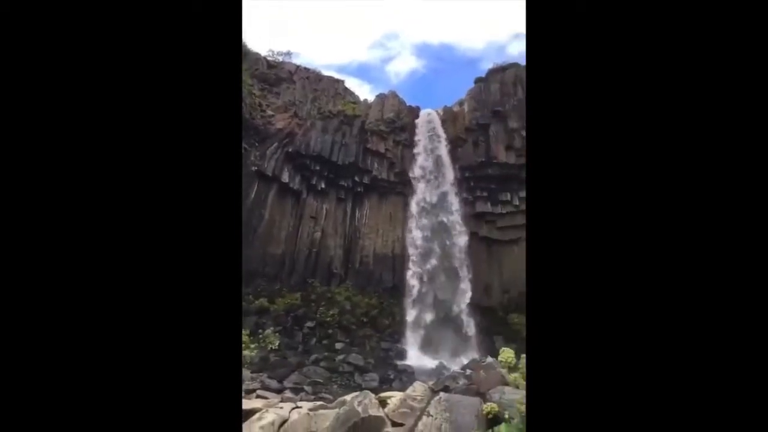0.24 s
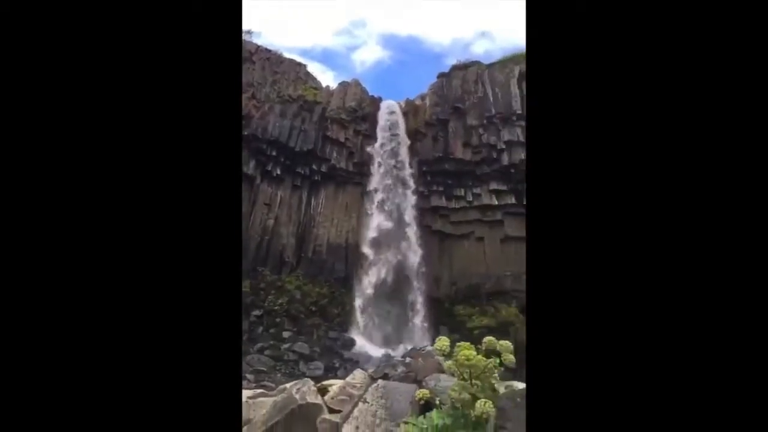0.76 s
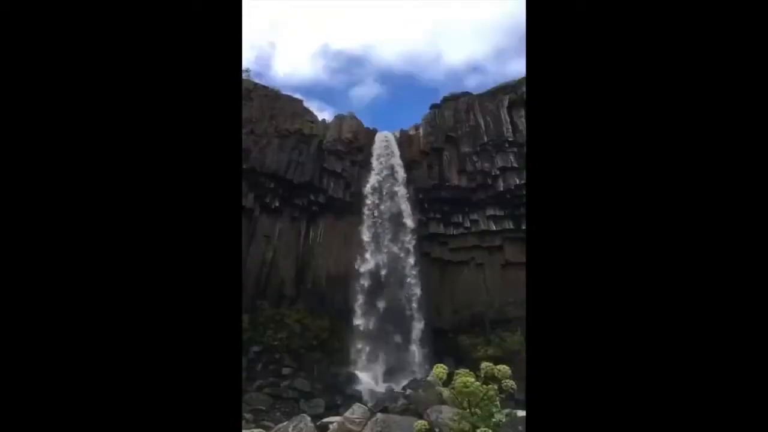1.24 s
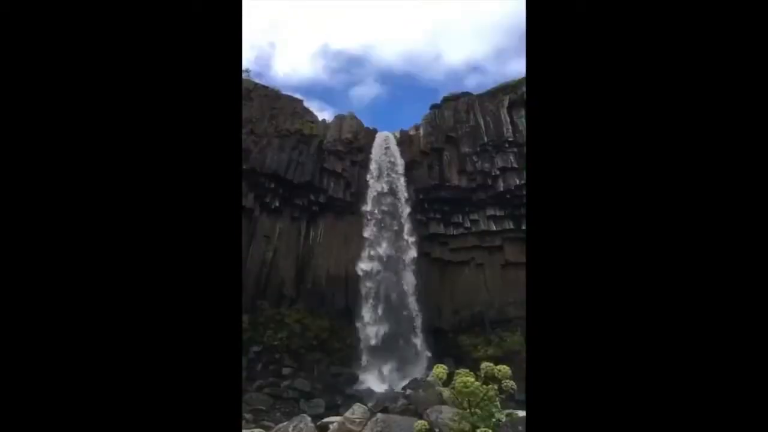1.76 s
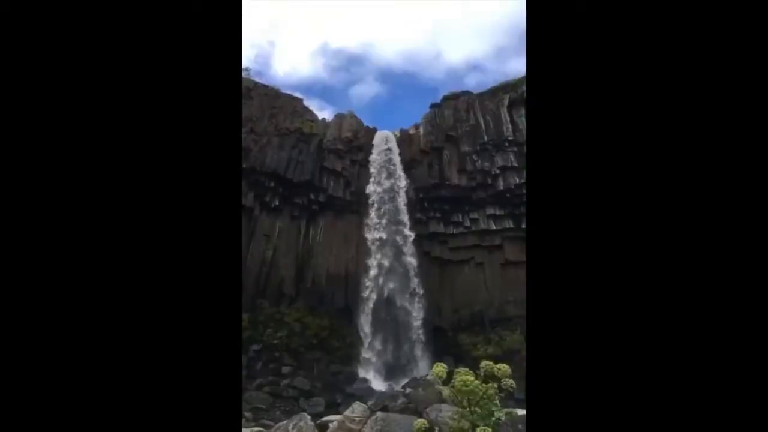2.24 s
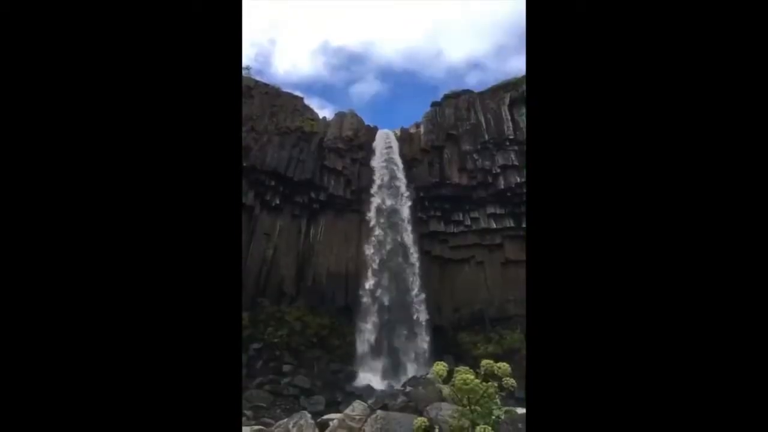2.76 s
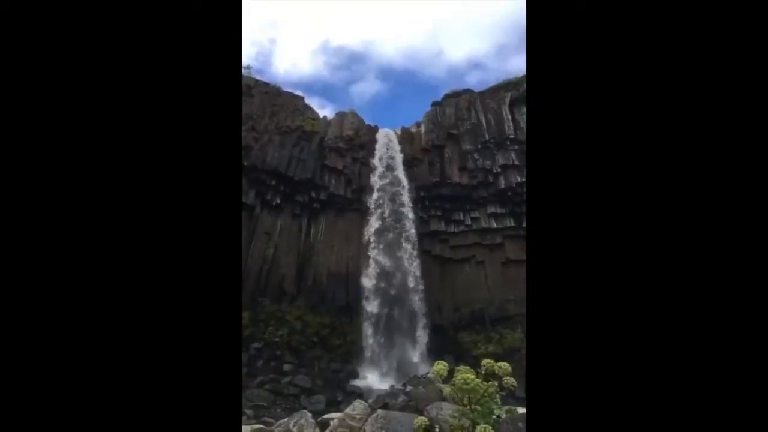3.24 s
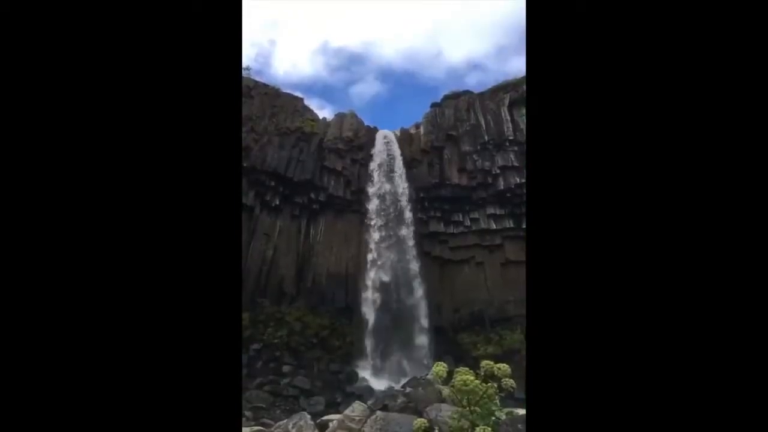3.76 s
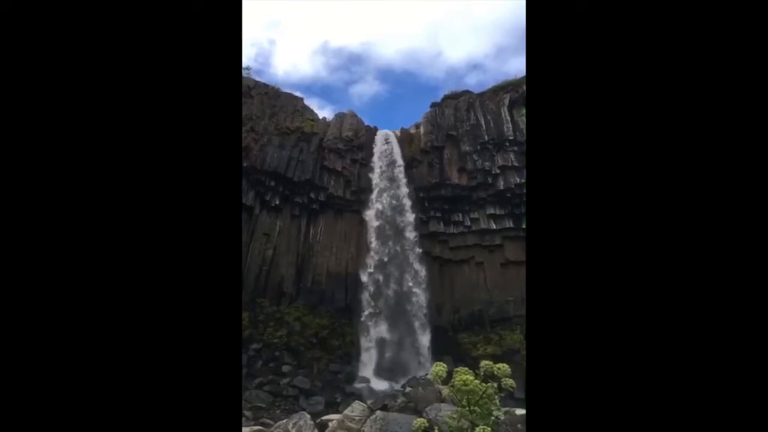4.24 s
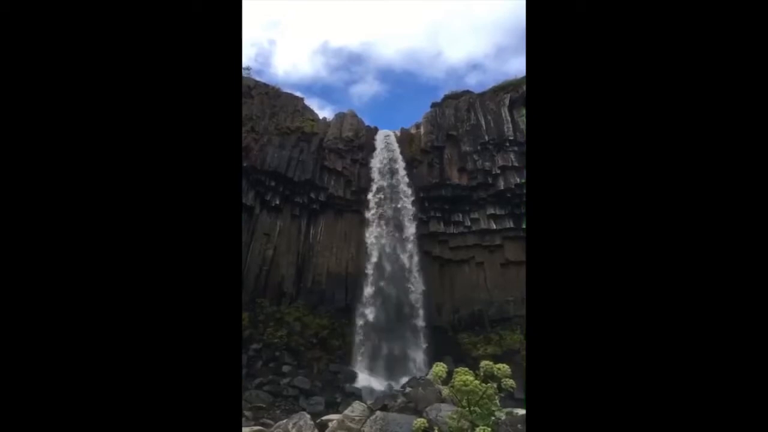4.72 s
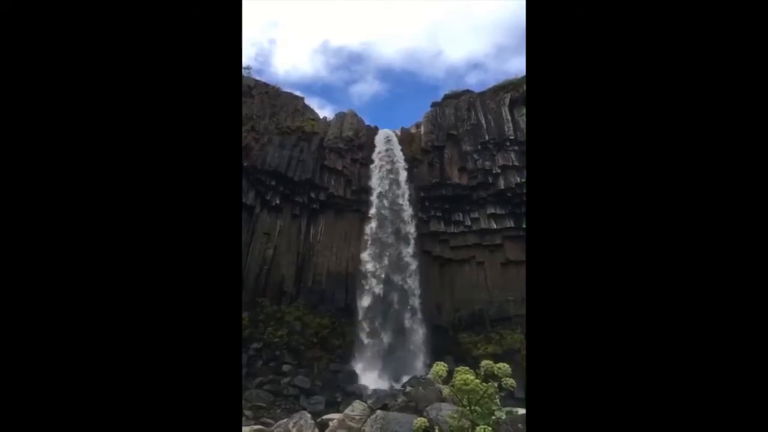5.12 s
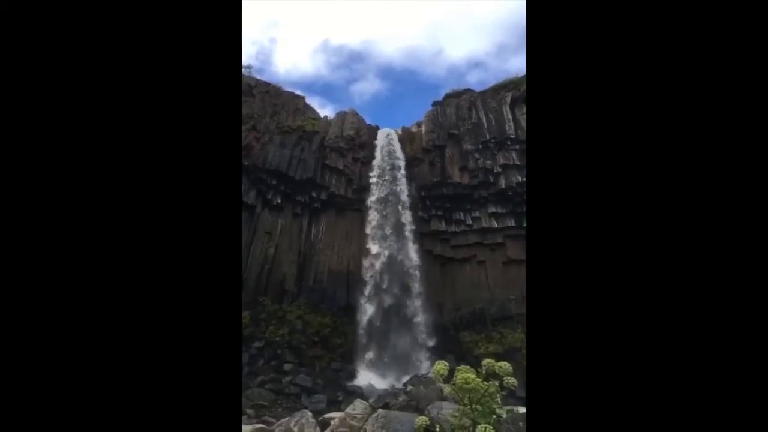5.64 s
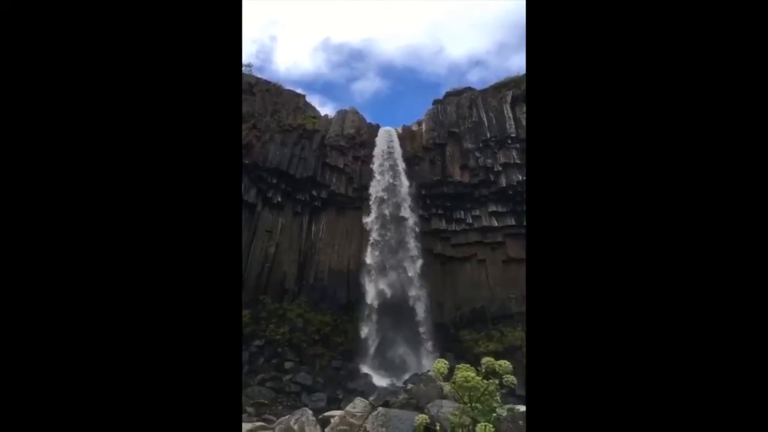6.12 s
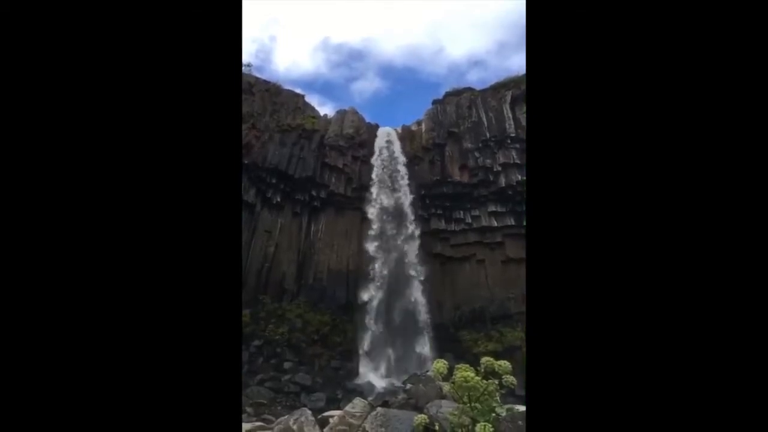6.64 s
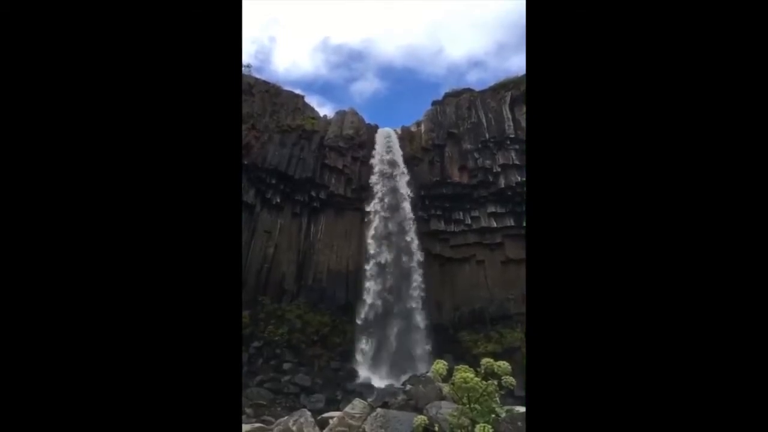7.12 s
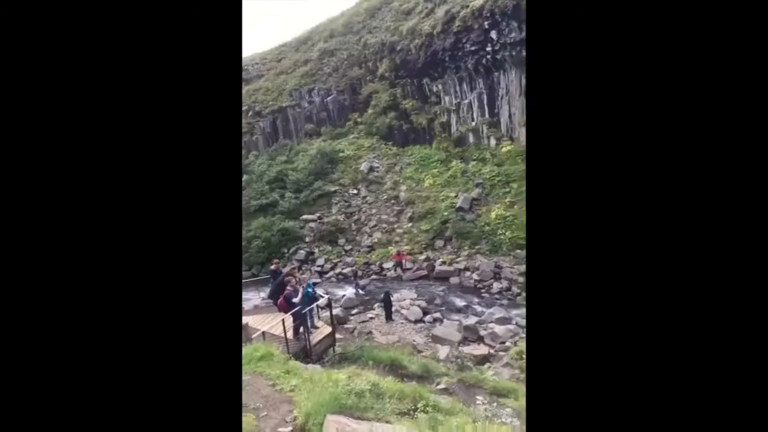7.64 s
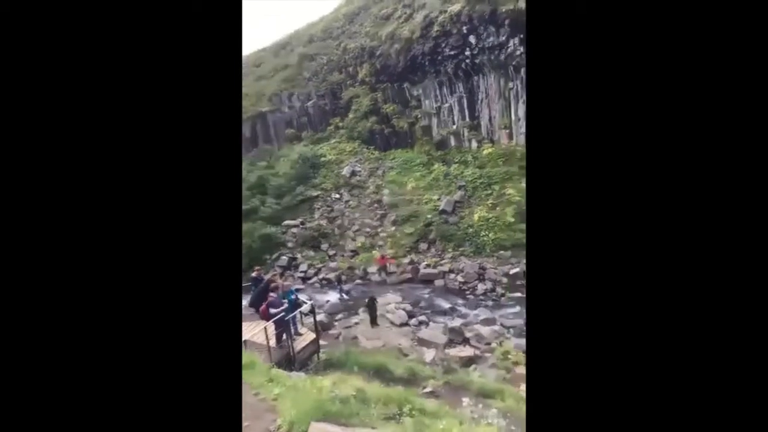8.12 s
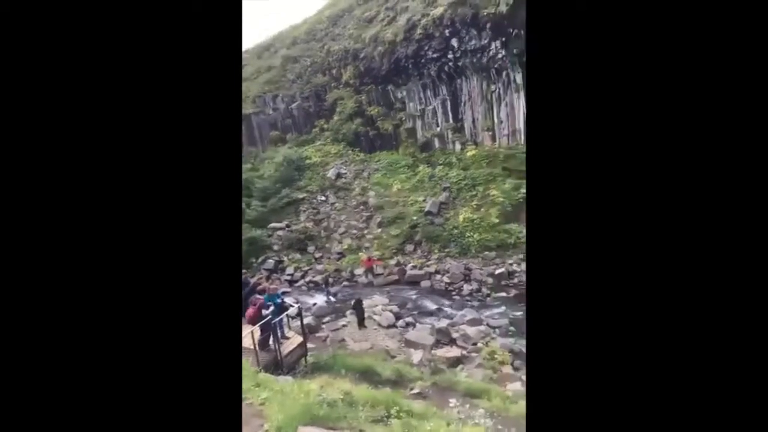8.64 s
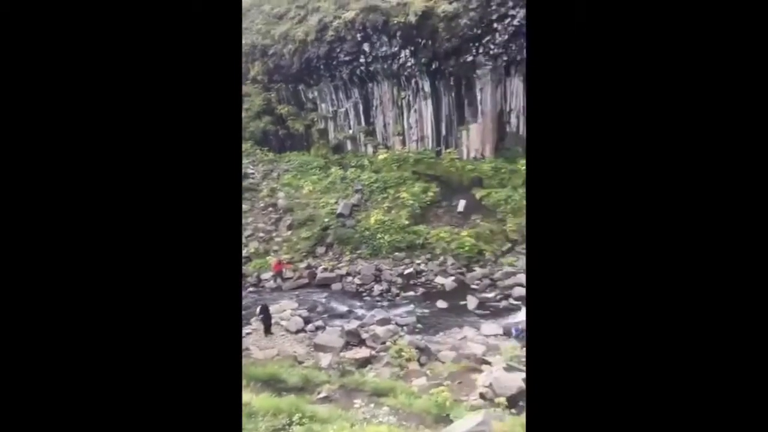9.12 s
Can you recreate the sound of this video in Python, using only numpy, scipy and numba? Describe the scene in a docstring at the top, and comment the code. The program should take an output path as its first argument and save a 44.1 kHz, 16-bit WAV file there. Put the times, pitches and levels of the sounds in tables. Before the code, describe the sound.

A tall waterfall roars and hisses onto rocks outdoors in three abruptly cut stretches, with short silences between and low bumping gusts beneath.

```python
"""A tall waterfall pounds rocks and a pool under a cliff, heard outdoors from three standpoints in turn.
The first stops near 0.96 s; the second starts at 1.01 s, takes a heavier sheet of water from 2.6 to 5 s
and is cut at 7.19 s, with two tiny clicks just after; the third runs from 7.77 s to the end, each with
its own colour. Throughout, ringing bubbles over noise make bass rumble, pool roar, spatter on stone and
hissing spray; short low pushes make the thuds of gusts and heavy slugs of water."""
import sys
import numpy as np
from scipy import signal
from scipy.fft import rfft, irfft, next_fast_len
from scipy.io import wavfile
from scipy.ndimage import map_coordinates
from numba import njit

SR = 44100
rng = np.random.default_rng(int(sys.argv[2]) if len(sys.argv) > 2 else 0)


def int16_out(signal):
    """Quantize to a 16-bit WAV file."""
    q = np.round(np.clip(np.atleast_2d(signal).T, -1, 1) * 32767)
    wavfile.write(sys.argv[1], SR, q.astype(np.int16))


def gain_from_decibels(decibels):
    """Convert decibel values to linear amplitude factors."""
    exponent = np.asarray(decibels, float) / 20
    return 10 ** exponent


N = 413658  # samples
T = np.arange(N) / SR  # s
COARSE_T = T[::64]  # s, enough for slow level changes
PAD = next_fast_len(N)
HZ = np.fft.rfftfreq(PAD, 1 / SR) + 1  # the 1 Hz offset keeps logarithms finite


def unit(x):
    """Scale to rms 1."""
    return x / np.sqrt(np.mean(x ** 2))


def walk(rate):
    """Smooth random wander of rms 1 on the coarse clock, through `rate` random points a second."""
    knots = rng.standard_normal(400)
    return unit(map_coordinates(knots, [COARSE_T * rate], order=3, mode="mirror"))


def follow(points):
    """Straight lines in dB between (time, level) points."""
    t, db = np.transpose(points)
    return np.interp(T, t, db)


def colour(x, points):
    """Filter by (frequency, dB) points, straight on a log frequency axis; rms 1."""
    hz, db = np.transpose(points)
    size = next_fast_len(len(x))
    bin_hz = np.fft.rfftfreq(size, 1 / SR) + 1
    gain = gain_from_decibels(np.interp(np.log(bin_hz), np.log(hz), db))
    return unit(irfft(rfft(x, size) * gain, size)[:len(x)])


def thuds():
    """A slug of water or a gust gives a low push of a cycle or two under a bell-shaped envelope."""
    # heavy bass thuds: t/s, envelope peak level/dB, f/Hz
    pushes = [(.4, -27, 60), (1.33, -26, 70), (1.72, -23, 70), (3.36, -24, 60), (3.5, -23, 55),
              (3.86, -22, 44.6), (4.42, -24, 100), (4.62, -25, 60), (5.0, -26, 45), (5.66, -21.5, 55),
              (6.5, -23, 65), (7.87, -27, 55), (8.13, -24, 70), (8.22, -21, 65), (8.285, -23, 65),
              (8.54, -27, 45), (8.612, -22, 55)]
    bell_cycles = 0.79  # from the peak to 1/e
    out = np.zeros(N)
    for (at, db, hz), phase in zip(pushes, rng.random(len(pushes))):
        near = slice(max(int((at - .1) * SR), 0), int((at + .1) * SR))
        turns = (T[near] - at) * hz
        envelope = gain_from_decibels(db) * np.exp(-(turns / bell_cycles) ** 2)
        out[near] += envelope * np.cos(2 * np.pi * (turns + phase))
    return out


@njit
def ring(start, stop, size, turn, bend, length):
    """Each bubble rings as a dying sine: a pointer that turns, shrinks and speeds up."""
    out = np.zeros(length)
    for j in range(len(start)):
        pointer, step = size[j], turn[j]
        for i in range(start[j], stop[j]):
            pointer *= step
            step *= bend[j]
            out[i] += pointer.imag
    return out


def impacts(lo_hz, hi_hz, rate, cycles, spread_db, share):
    """Near drops trap bubbles of uneven size over a noise blur of countless far ones."""
    when, pitch, chance = rng.random((100000, 3))[:int(rate * N / SR)].T
    hz = lo_hz * (hi_hz / lo_hz) ** (1.2 * pitch - .1)  # spills a little past both edges
    size_db = np.minimum(-spread_db * np.log(chance + 1e-9), 12)
    size = hz * gain_from_decibels(size_db)  # small bubbles die sooner, so they strike harder for an even spectrum

    step = 2 * np.pi * hz / SR  # radians a sample
    span = cycles * SR / hz  # samples in which the ring falls by e^3
    start = (when * N).astype(np.int64)
    stop = np.minimum(start + 2 * span, N).astype(np.int64)
    turn = np.exp(1j * step - 3 / span)
    bend = np.exp(1j * step * 0.029 / span)  # pitch creeps up as the bubble nears the surface
    near = ring(start, stop, size + 0j, turn, bend, PAD)

    far = rng.standard_normal(PAD) * np.sqrt(SR / 2 / (hi_hz - lo_hz))  # rms 1 within the layer
    share = np.clip(share, 0, 1)
    return np.sqrt(share) * unit(near) + np.sqrt(1 - share) * far


def churn(layer, surge):
    """Impacts split by bubble size: all sizes surge together, neighbours share patches, each flickers alone."""
    bands = 6
    lo_hz, hi_hz, *bubbles, surge_db, patch_db, flicker_db = layer
    spectrum = rfft(impacts(lo_hz, hi_hz, *bubbles))[HZ < 1.5 * hi_hz]
    place = np.log(HZ[:len(spectrum)] / lo_hz) / np.log(hi_hz / lo_hz) * bands - .5
    patches = walk(6.9), walk(6.8)
    out = np.zeros(N)
    for k in range(bands):
        weight = np.cos(np.pi / 2 * np.clip(place - k, -1, 1)) ** 2  # bands crossfade
        turn = np.pi / 2 * k / (bands - 1)  # lowest band takes one patch, highest the other
        patch = np.cos(turn) * patches[0] + np.sin(turn) * patches[1]
        db = surge_db * surge + patch_db * patch + flicker_db * walk(18.)
        band = irfft(spectrum * weight, PAD)[:N]
        out += band * np.interp(T, COARSE_T, gain_from_decibels(db))
    return out


def bumps(times, dbs, length):
    """Bell-shaped level changes in dB."""
    bells = np.exp(-((COARSE_T[:, None] - times) / length) ** 2)
    return np.interp(T, COARSE_T, bells @ dbs)


def levels():
    """Level of each layer in dB: its slow course, brief random level changes, and a random heave."""
    # slow course of the bass rumble: t/s, level/dB
    rumble = [(0, -33), (.2, -37), (.96, -36.5), (1.01, -35), (1.4, -33.5), (1.7, -35.5), (2.0, -32.5),
              (2.9, -31.5), (3.15, -36), (3.5, -33), (4.45, -32), (4.8, -32.5), (5.2, -31), (5.95, -33),
              (6.4, -32.5), (6.75, -33.5), (7.19, -34.5), (7.77, -38), (8.2, -30.5), (8.4, -35.5),
              (8.57, -32.5), (8.72, -36), (9.38, -35)]
    # slow course of the pool's roar: t/s, level/dB
    roar = [(0, -30.5), (.27, -34), (.6, -30.5), (.96, -31), (1.01, -30.5), (1.75, -29), (3.3, -31),
            (4.0, -30.5), (4.3, -29.5), (5.0, -31.5), (5.5, -28), (5.92, -32.5), (6.4, -28.5), (7.19, -31),
            (7.77, -34), (8.2, -32), (8.6, -33), (9.38, -33)]
    # slow course of the spatter on stone, a heavier sheet of water from 2.6 to 5 s: t/s, level/dB
    spatter = [(0, -32), (.96, -32), (1.01, -30), (1.6, -31.5), (1.819, -31.5), (2.6, -31), (2.635, -27.5),
               (3.85, -27.5), (4.03, -30), (4.25, -26.5), (4.85, -27.5), (5.05, -31), (5.55, -29.5),
               (5.93, -33), (6.2, -29.5), (7.19, -31.5), (7.77, -37), (8.1, -35.5), (8.85, -36.5),
               (9.2, -33), (9.38, -34.5)]
    # slow course of the spray: t/s, level/dB
    spray = [(0, -38.5), (.4, -37), (.96, -39), (1.01, -34), (1.45, -33.5), (1.65, -35.5), (2.5, -35),
             (2.65, -33.5), (3.28, -32.5), (3.4, -33.5), (3.8, -32.5), (4.6, -32.5), (5.3, -34),
             (5.95, -35.5), (6.15, -34), (7.19, -36), (7.77, -38.5), (8.08, -37.5), (8.55, -41), (9.2, -37),
             (9.38, -37)]
    # brief random level changes, up (+) or down (-): t/s, roar/dB, spatter/dB, spray/dB
    level_bumps = [(.7, 1, 2, 2), (.745, -2.5, 0, -6), (.88, 0, -2, -5), (1.82, -0.5, 4.5, 4),
                   (2.45, 0, -1.5, -4), (2.67, -0.5, 1, 2), (3.2, 2.5, 0, -0.5), (3.35, -2, -3, -1),
                   (3.82, 0, 2, 0), (4.12, -4, -3, -1), (4.73, 2, 0.5, -4), (5.22, -1.5, -4, -3),
                   (5.57, 1, 2, -0.5), (6.05, 1, 3, -2), (6.2, -1.5, -0.5, 0), (6.31, 0.5, 0, 3),
                   (6.8, 2, -1.5, -2.5), (7.07, 2.5, 1, -2), (7.92, 2.5, 0, -3), (8.09, 1.5, 2, 3.5),
                   (8.135, 3, 2, 0.5), (8.28, 3, 1.5, 0), (8.45, 2, 1.5, -0.5), (8.612, 2.5, 2, 1),
                   (8.68, -3.5, -2, 0), (8.72, 1, 2, 1), (8.79, 2, 1, 1)]
    # rms of the random heave, one value a layer from bass to spray: level/dB
    heave_db = [1.1, 0.33, 0.51, 0.41]
    bump_s, heaves_per_s = .021, 8.
    when, *dbs = np.transpose(level_bumps)
    changes = [0] + [bumps(when, db, bump_s) for db in dbs]  # the rumble has none
    out = []
    for course, change, db in zip((rumble, roar, spatter, spray), changes, heave_db):
        heave = db * np.interp(T, COARSE_T, walk(heaves_per_s))
        out.append(follow(course) + change + heave)
    return out


def opening(t, stop, tail_db, tail_s):
    """Gain of a standpoint: the sound stops abruptly, leaving a dying tail and any clicks just after the cut."""
    # two tiny clicks of sound just after the middle cut: t/s, level against the flow/dB, length/s
    clicks = [(7.201, -16, 0.0005), (7.204, -10, .001)]
    tail = gain_from_decibels(tail_db) * np.exp(-np.clip(t - stop, 0, None) / tail_s)
    click_gain = sum(gain_from_decibels(db) * np.exp(-np.minimum(((t - at) / length) ** 2, 50)) for at, db, length in clicks)
    return np.where(t < stop, 1, tail + click_gain)


def scene():
    """The same falling water, coloured anew at each standpoint, with thuds beneath."""
    # rumble, roar, spatter and spray: lowest f/Hz, highest f/Hz, bubbles/per s, ring/cycles,
    # size spread/dB, bubble share of power/0-1, surge/dB, patch/dB, flicker/dB
    water_layers = [(18, 260, 140, 4.5, 0.5, 0.22, 0.5, 0.85, 1.4),
                    (247.06, 1900, 450, 55, 0.9, 0.58, 0.57, 0.28, 0.5),
                    (1879, 5500, 1200, 62, 1.5, 0.43, 0.83, -0.07, 0.86),
                    (5320, 15500, 9700, 4.3, 2.5, 0.4, 0.36, -0.35, 0.92)]
    # colour of rumble and roar, one curve a standpoint: f/Hz, relative level/dB per Hz
    low_colours = [
        [(12, -56), (20, -28.5), (65, -3), (134, -11), (157, -10.5), (208, -13), (299, -9), (455, -14),
         (540, -10.5), (1600, -9), (1900, -8), (2470, -41), (4180, -120)],
        [(12, -32), (20, -11.5), (54, 1), (92, -3), (160, -5), (204, -9), (305, -10.5), (447, -13.5), (572, -9),
         (761, -12.5), (957, -10), (1300, -10.5), (1430, -13.5), (1900, -10.5), (2470, -45), (4180, -120)],
        [(12, -42), (20, -5.5), (54, -5.5), (120, -10), (157, -15.5), (216, -12), (369, -15.5), (473, -16),
         (666, -12), (939, -15.5), (1460, -13.5), (1900, -17.5), (2470, -50), (4180, -120)],
    ]
    # colour of spatter and spray, cliff echo included, one curve a standpoint: f/Hz, relative level/dB per Hz
    high_colours = [
        [(1120, -28), (1900, -10.5), (2600, -8.5), (3830, -14.5), (4210, -12.5), (4760, -17), (5730, -15.5),
         (7000, -17), (7780, -20), (9600, -19), (10400, -24.5), (11500, -20.5), (12300, -24), (15400, -38.5)],
        [(1120, -35.5), (1900, -8), (2120, -6.5), (2340, -2), (2970, -8.5), (3220, -7), (3800, -8.5),
         (4500, -6), (5050, -8), (5450, -10.5), (5830, -11.5), (6940, -13.5), (9270, -10.5), (10600, -12.5),
         (11600, -9.5), (13300, -16), (14700, -30.5), (15400, -28)],
        [(1120, -29), (1900, -2.5), (2260, -8.5), (2790, -11.5), (3130, -7.5), (4110, -10), (4930, -12),
         (6300, -10.5), (7990, -15), (9350, -14.5), (12900, -21.5), (13900, -25.5), (15400, -37)],
    ]
    # standpoints: start t/s, stop t/s, dying tail level/dB, tail decay/s
    standpoints = [(0, .9626, -63, .005), (1.0104, 7.1945, -21, .008), (7.765, 9.4, -99, 1)]
    surge = walk(17.)  # slugs of water reach the rocks unevenly
    layers = [churn(layer, surge) for layer in water_layers]
    gains = gain_from_decibels(levels())
    out = np.zeros(N)
    for low, high, (start, stop, *tail) in zip(low_colours, high_colours, standpoints):
        here = (T >= start) & (T < stop + .045)  # room for the tail
        water = sum(colour(layer[here], points) * gain[here]
                    for layer, points, gain in zip(layers, (low, low, high, high), gains))
        out[here] = water * opening(T[here], stop, *tail)
    out = out + thuds()
    return np.array([out, out])


def band_limit(x):
    """A steep low-pass at the top of the band."""
    return signal.sosfilt(signal.butter(12, 15800, fs=SR, output="sos"), x)


def record(dry):
    """One microphone signal on both channels, its top cut off steeply by an elliptic low-pass."""
    top = signal.ellip(10, .2, 60, 15200, fs=SR, output="sos")  # ripple dB, stopband dB, edge Hz
    # the tiny offset keeps the silences quick to compute
    mix = signal.sosfilt(top, dry + 1e-12)
    return band_limit(mix)


dry = scene()
out = record(dry)
int16_out(out)
```